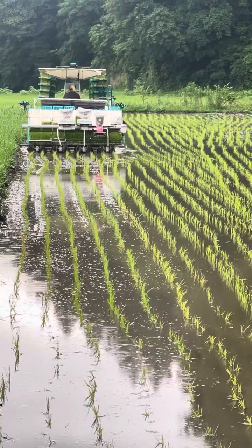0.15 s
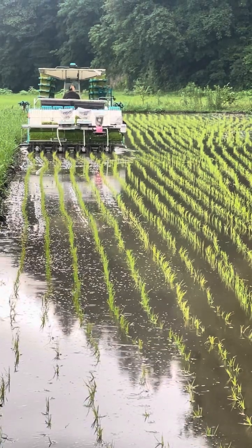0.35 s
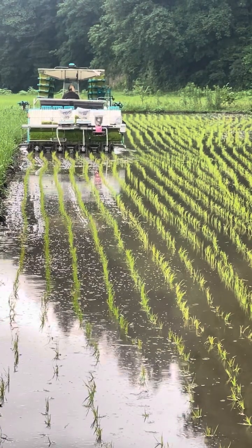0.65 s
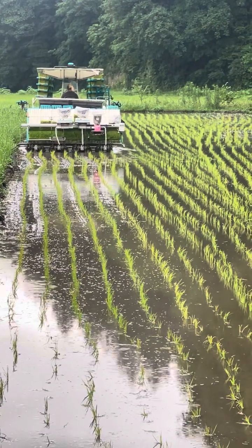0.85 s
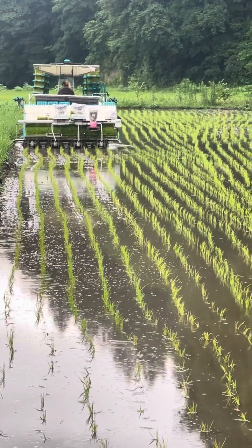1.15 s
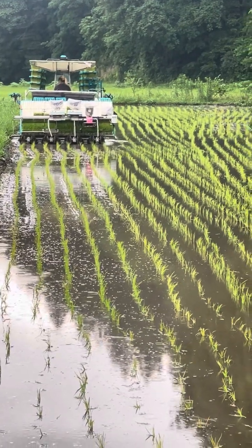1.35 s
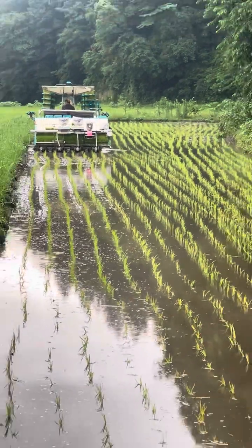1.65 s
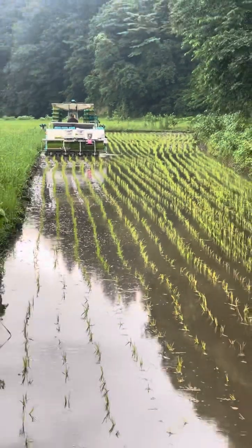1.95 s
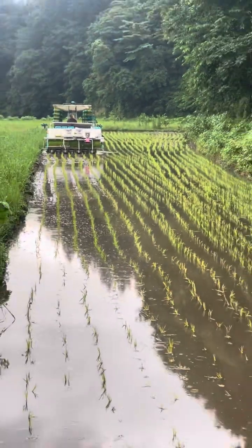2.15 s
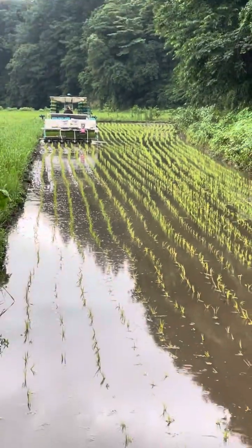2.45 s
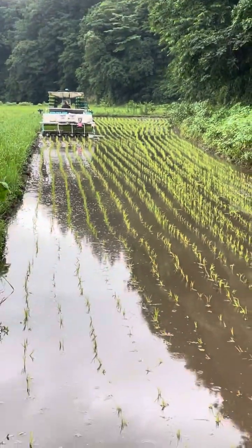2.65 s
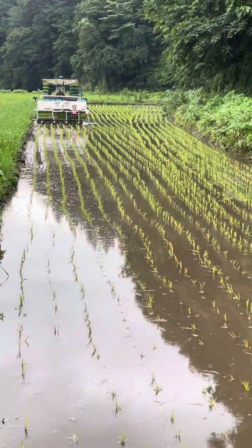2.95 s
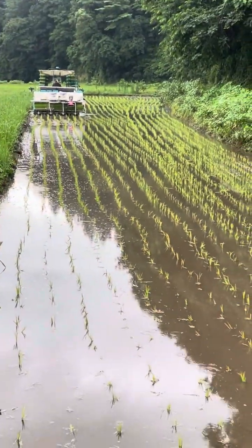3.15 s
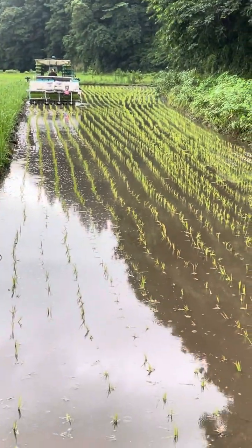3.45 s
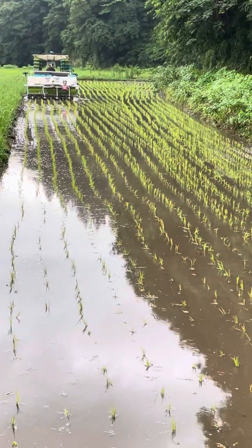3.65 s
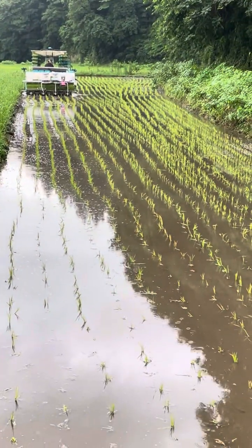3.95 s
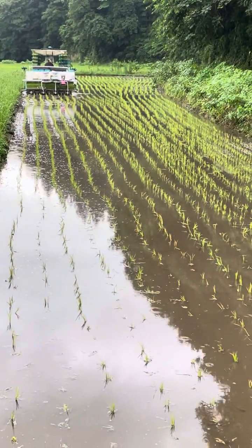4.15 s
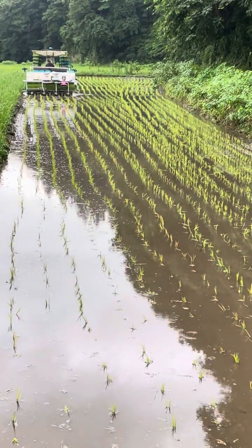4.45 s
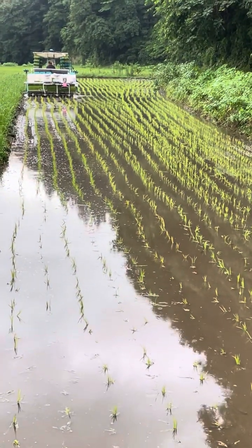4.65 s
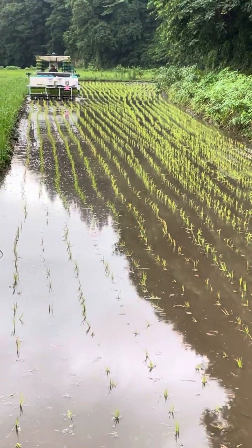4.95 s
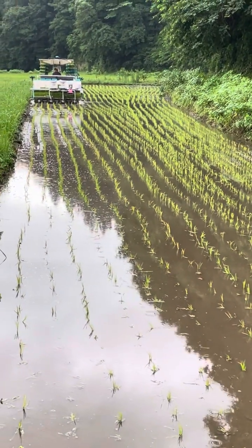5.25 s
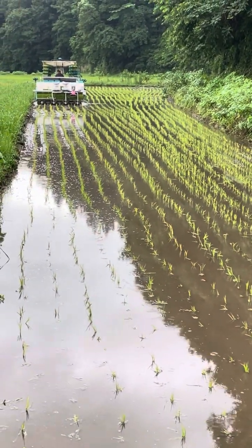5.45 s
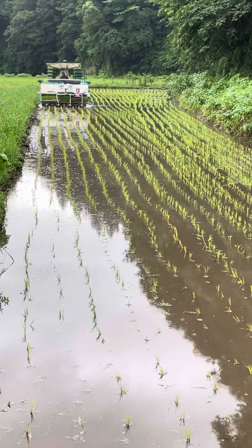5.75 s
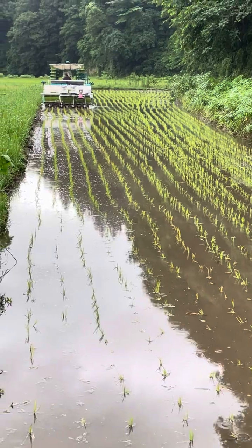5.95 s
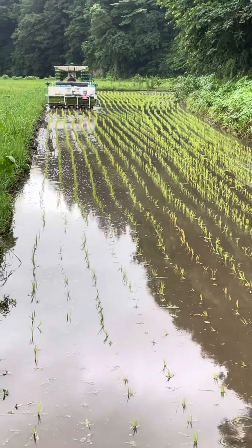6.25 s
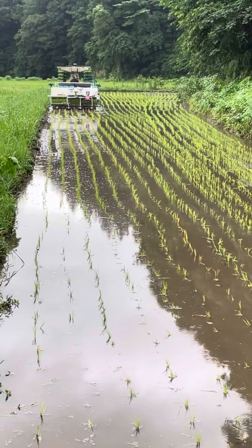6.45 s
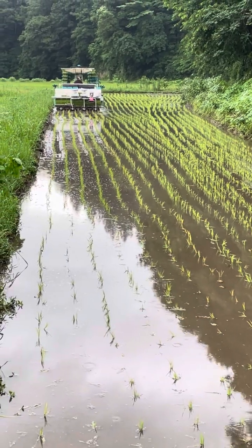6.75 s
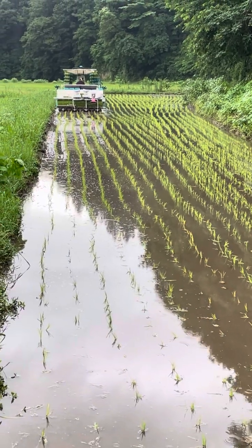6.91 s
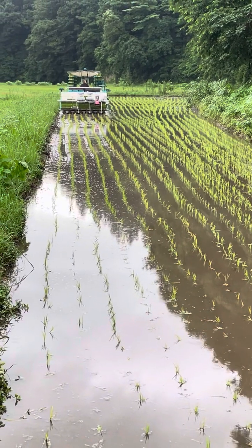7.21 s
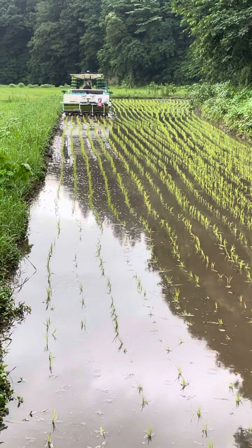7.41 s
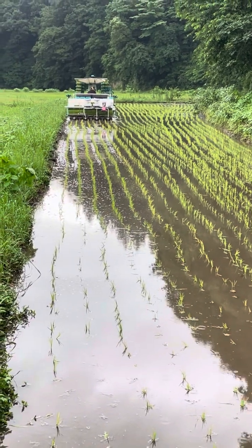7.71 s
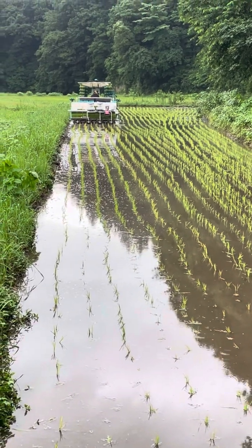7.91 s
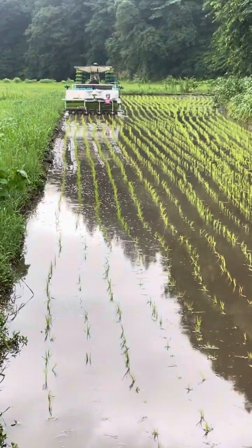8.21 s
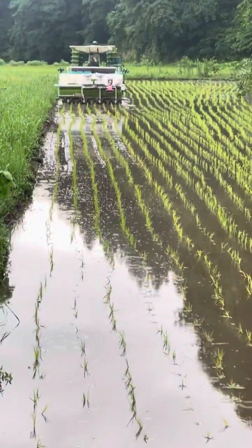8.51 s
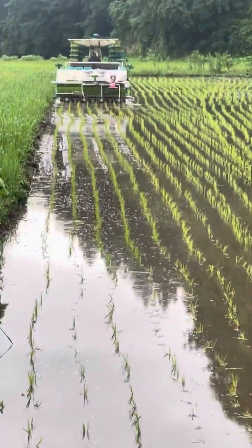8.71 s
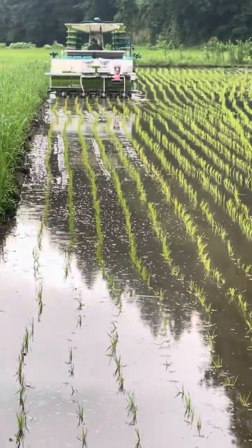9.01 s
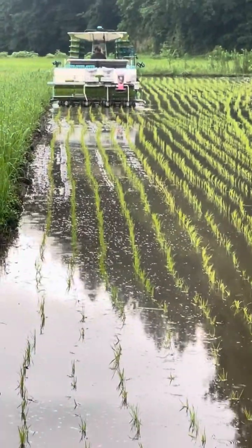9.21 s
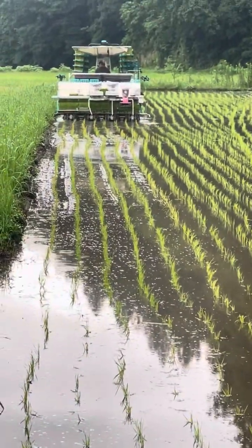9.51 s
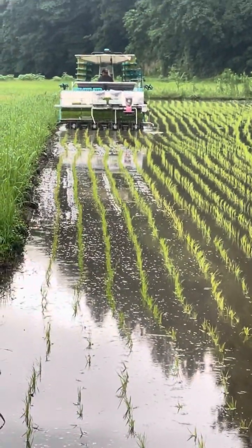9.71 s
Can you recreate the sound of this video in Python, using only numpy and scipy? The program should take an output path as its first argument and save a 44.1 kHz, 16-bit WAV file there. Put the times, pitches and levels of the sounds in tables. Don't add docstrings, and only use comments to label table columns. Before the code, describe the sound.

A planting machine's low two-cylinder engine drones across a flooded field, easing quieter then returning slightly, under steady hissing rain with clacks, drips and brief bird whistles.

```python
import sys
import numpy as np
from scipy import signal
from scipy.fft import rfft, irfft, next_fast_len
from scipy.io import wavfile
from scipy.ndimage import uniform_filter1d, map_coordinates

SR = 44100
rng = np.random.default_rng(int(sys.argv[2]) if len(sys.argv) > 2 else 0)


def log_audio(samples):
    frames = np.atleast_2d(samples).T
    limited = np.clip(frames, -1, 1)
    pcm = np.round(limited * 32767).astype(np.int16)
    wavfile.write(sys.argv[1], SR, pcm)


def to_linear_factor(level_db):
    exponent = np.asarray(level_db, float) / 20
    return 10 ** exponent


N = 435266

# (t/s, drone level/dB, exhaust level/dB, imbalance of the two cylinders/dB)
ENGINE_PATH = [(0, -34, -42.5, 1), (.5, -34, -46.5, -7), (.75, -33.5, -45, -2), (1.15, -36, -43.5, -4),
               (1.75, -35, -45, 0), (2.1, -39, -50, -1), (2.45, -42, -50.5, 2), (3.5, -39.5, -51, -5),
               (4.1, -42, -52.5, 0), (4.8, -41.5, -59.5, 2), (5.3, -40, -55.5, 0), (5.5, -41, -54.5, -2),
               (6.3, -39.5, -51.5, -3), (6.7, -41.5, -56, -5), (7.7, -46, -57.5, -3), (8.5, -47, -56, 0),
               (8.95, -45.5, -52.5, -7), (9.87, -41, -49, -5)]
# (t/s, f/Hz)
FIRING_SPEED = [(0, 60.9), (.93, 61.77), (2.1, 60.95), (2.4, 60.97), (3.76, 61.93), (5.15, 60.93),
                (5.58, 61.83), (6.14, 61.15), (6.95, 61.86), (8.9, 61.07), (9.27, 62)]
# (t/s, half length/s, level/dB)
LOAD_SURGES = [
    (0.103, 0.15, 7.5),
    (0.354, 0.044, 2.5),
    (0.926, .11, 7.5),
    (5.9, 0.065, 4),
    (6.067, 0.08, 4.5),
    (8.6, 0.089, 2.5),
]
# (t/s, level/dB)
LOW_SWELLS = [
    (1.67, 5),
    (4.63, 4),
    (6.5, 1),
    (7.39, 7),
    (7.83, 4),
    (8.25, 9),
    (8.49, 9),
    (8.64, 9),
    (9.29, 16),
]
# (multiple, level/dB)
UPPER_ORDERS = [(3, -1.5), (4, 0), (5, -16), (6, -6), (6.5, -11), (7, -4.5), (7.5, -14.5)]
# (f/Hz, level/dB per Hz)
EXHAUST_COLOUR = [(30, -17), (60, -2), (100, -0.5), (200, -5.5), (300, 0.5), (440, 0.5), (520, -12.5),
                  (800, -34), (1200, -60)]
# (f/Hz, width/Hz, level/dB, gear 0 low or 1 high)
GEAR_TONES = [
    (661, 10, -64, 0),
    (1322, 10, -63, 0),
    (1655, 22, -62.5, 1),
]
# (t/s, speed ratio, low gear level/dB, high gear level/dB)
WHEEL_DRIVE = [(0, 1, 1, 0), (.8, 1, 0, 1), (1, 1.017, 0, 3), (1.5, 1.021, 3, 4), (1.75, 1.016, -4, 3),
               (2, 1, -3, -4), (2.25, 1, 4, 0), (3.6, .999, 2, 1), (3.9, 1.02, -4, -2),
               (5.05, 1.021, -2, -3), (5.3, 1, 3, 0), (5.85, 1.02, -4, 0), (6.2, 1.001, 4, 1),
               (6.8, 1.008, -3, 2), (7.6, 1.018, -5, 0), (8.7, 1.017, -5, 3), (9.05, .999, -5, 3),
               (9.4, 1.015, 0, 2)]
# (t/s, level/dB)
RAIN_STRENGTH = [(0, -0.5), (.22, 1.5), (.5, -.5), (1.7, 1.1), (2.6, 0), (3.7, 1.5), (4.5, -.5), (5.4, -1),
                 (6.02, 1), (6.4, 0.5), (7.45, -1), (7.7, -4.5), (7.95, -2.5), (8.2, 1), (8.5, -0.8),
                 (8.75, 1), (9.3, -0.1), (9.87, -.3)]
# (t/s, level/dB)
WASH_SWAY = [(0, 3.5), (1.9, 3.5), (2.6, 1), (6.3, 1), (7.1, -2.5), (8.1, -4), (9.3, 0), (9.87, 1.5)]
# (f/Hz, level/dB per Hz)
WASH_COLOUR = [(200, -34), (450, -0.5), (620, -3.5), (800, 0.5), (1100, -1), (1450, -4.5), (2000, -13.5),
               (3000, -48)]
PATTER_COLOUR = [(800, -39), (1400, -12.5), (1800, 0), (2600, -1.5), (3400, -2.5), (4500, -7), (5500, -15),
                 (7000, -39)]
FIZZ_COLOUR = [(3000, -46), (4500, -8.5), (5500, -1.5), (7500, -1), (10000, 2), (12000, -5.5), (13800, -9),
               (16000, -15.5)]
# (t/s, peak level/dB, f/Hz)
SHARP_DROPS = [(0.0513, -40, 5260), (0.1531, -40, 5850), (0.2189, -38, 5430), (0.2448, -35, 6560),
               (0.5407, -38, 7460), (0.7327, -38, 4240), (0.829, -37, 4600), (1.2261, -39, 4200),
               (1.3264, -34, 5750), (1.4037, -39, 6000), (1.4361, -38, 5770), (1.5618, -40, 5810),
               (1.8662, -37, 4300), (1.934, -29, 5210), (2.2049, -37, 5260), (2.2443, -40, 4400),
               (2.2712, -33, 6310), (2.3067, -35, 4780), (2.369, -39, 6640), (2.579, -40, 6170),
               (2.6529, -39, 5630), (2.8095, -39, 4430), (3.0076, -35, 4290), (3.1752, -34, 4730),
               (3.3912, -37, 5426), (3.5843, -33, 5270), (3.677, -33, 6210), (3.7703, -39, 4220),
               (3.8247, -38, 5210), (3.9589, -34, 5905), (4.0472, -34, 6240), (4.125, -34, 5600),
               (4.1589, -28, 5560), (4.2842, -37, 5300), (4.5246, -37, 5470), (4.5875, -37, 4460),
               (4.9566, -32, 7460), (5.2734, -37, 4275), (5.5613, -40, 6980), (5.6531, -38, 5450),
               (6.3031, -35, 6920), (6.326, -35, 5820), (6.3884, -36, 5670), (6.5, -29, 7190),
               (6.7865, -41, 4220), (7.2664, -35, 5890), (7.4155, -33, 4490), (7.4719, -35, 4490),
               (7.5827, -36, 4490), (7.9463, -36, 4470), (8.0815, -36, 5295), (8.2492, -33, 4630),
               (8.5185, -35, 7400), (8.5724, -35, 4470), (8.6043, -37, 4470), (8.8443, -41, 6480),
               (9.0588, -37, 4230), (9.8051, -39, 4293)]
# (t/s, peak level/dB, f/Hz)
BUBBLE_DROPS = [(0.7355, -35, 2460), (0.829, -30, 3050), (1.0344, -35, 1700), (1.2275, -34, 1830),
                (1.3268, -38, 2050), (1.5183, -33, 1850), (2.2075, -31, 2120), (2.627, -33, 2590),
                (2.6832, -36, 2150), (2.9795, -39, 2127), (3.0753, -31, 2330), (3.6221, -38, 2270),
                (3.6739, -43, 1900), (4.1247, -39, 2010), (4.1921, -35, 2270), (4.3569, -33, 1970),
                (4.7475, -34, 2100), (5.6525, -30, 1890), (5.7946, -31, 2000), (6.075, -36, 1980),
                (6.1997, -36, 1950), (6.2974, -36, 1880), (6.3254, -34, 1890), (6.723, -34, 2370),
                (6.758, -34, 2080), (7.1888, -30, 3245), (7.2403, -37, 2740), (7.3207, -36, 2030),
                (7.5438, -31, 3610), (8.1513, -36, 1907), (8.9475, -32, 1930), (9.4383, -31, 2503)]
# (start t/s, length/s, from f/Hz, to f/Hz, level/dB)
BIRD_SONG = [
    (.01, .07, 2760, 3010, -4.5),
    (.055, .085, 3010, 2700, -5.5),
    (.185, .055, 2660, 2615, 1),
    (.237, .052, 2590, 2565, 2),
    (.28, .045, 2560, 2510, -8),
    (.32, .04, 2330, 2130, -2),
]
NOTE_FLUTTERS = [0.032, .034, .01, 0.014, .02, 0.036]
# (start t/s, level/dB, pitch ratio, length ratio, flutter ratio)
BIRD_PHRASES = [
    (-.315, -39.5, 1.08, 1, 1.3),
    (.04, -41.5, 1, 1, 1.15),
    (.432, -41.5, .995, 1.08, 1.15),
]
# (start t/s, length/s, from f/Hz, to f/Hz, level/dB)
FAR_PHRASE = [
    (7.03, .12, 3750, 3735, -56.5),
    (7.13, .08, 3735, 3720, -61),
    (7.2, .06, 2830, 2720, -52.5),
    (7.395, .03, 2790, 2850, -47.5),
    (7.413, .055, 3020, 3030, -46.5),
    (7.44, .07, 2850, 2800, -55),
    (7.576, .092, 2660, 2590, -45.5),
    (7.665, .055, 2610, 2570, -53),
    (7.73, .05, 2380, 2250, -50),
]
# (t/s, peak level/dB, f/Hz)
CLACKS = [(0.217, -28.5, 2650), (2.313, -32, 5000), (0.737, -33, 3890), (0.829, -36, 4000),
          (1.1123, -30, 2150), (1.2284, -35, 3520), (1.561, -37, 2690), (1.93, -29, 1900),
          (2.2457, -33, 3364), (2.3065, -28.5, 2920), (3.0076, -31.5, 2120), (3.0483, -38, 3270),
          (3.1745, -28, 3800), (3.367, -29, 2650), (3.3972, -31, 2910), (3.771, -31.5, 3960),
          (4.5237, -33, 2730), (5.2727, -30, 3540), (6.0292, -31.5, 3940), (6.4073, -36, 2670),
          (6.4974, -33, 3330), (6.657, -35.5, 3240), (6.787, -32, 2700), (6.96, -32, 2430),
          (7.3925, -31.5, 3200), (8.049, -35, 3210), (8.1271, -36, 3700), (8.604, -37, 2770),
          (8.905, -32, 3100), (9.0588, -35.5, 4205)]
# (t/s, peak level/dB, share unlike at the two ports)
CLOSE_DROPS = [(0.2453, -37, 1), (0.3511, -46, .2), (0.5427, -44.5, .2), (0.7332, -42, .2),
               (1.1134, -37, .2), (1.405, -43, .7), (2.0058, -35, .5), (2.2049, -35, 0.61),
               (2.6274, -41, .2), (3.3912, -34, 0.64), (4.1505, -37, .2), (5.0898, -34, .2),
               (5.5618, -45, .2), (5.654, -36, .2), (5.902, -40, .2), (6.4093, -36, 0.93),
               (6.7246, -46, .2), (7.43, -43, 0.93), (7.6176, -36, .4), (8.527, -40, 0.84),
               (9.2289, -47, .2)]
# (f/Hz, level/dB per Hz)
CLOSE_DROP_COLOUR = [(4000, -25), (7500, -2), (10500, -0.5), (13000, -1), (15500, -7)]
# (t/s, peak level/dB, f/Hz, rise/s)
FINGER_KNOCKS = [(4.2266, -33.5, 490, 0.0024), (4.2303, -25, 280, 0.0024), (4.5355, -13.5, 268, 0.0063),
                 (4.5285, -33, 450, .002), (4.746, -32, 520, .002), (4.7536, -12, 290, 0.00535),
                 (6.4778, -19.5, 180, 0.0037), (6.4755, -25, 420, 0.0015), (6.484, -25, 299.4, 0.004),
                 (6.4935, -28.5, 110, 0.0036), (9.670, -30, 1230, 0.0016), (9.669, -35, 1700, 0.0014),
                 (.83, -34.5, 4000, 0.0018), (4.3, -39, 310, 0.026)]
# (pitch ratio, level/dB)
CASE_OVERTONE = (1.96, -19)
# (f/Hz, phase/radians)
PORT_LEAD = [(0, 0), (330, 0), (600, -.3), (900, .2), (1400, 0), (4000, .15), (4900, 1.8), (5060, 0),
             (5500, 0), (9900, 3.14), (11500, 4.25), (13300, 5.1), (14650, 6.28), (22050, 6.28)]
# (f/Hz, level/dB)
PORTS_APART = [(60, -49), (200, -38), (400, -19), (650, -9), (900, -11), (1150, -9), (1700, -16),
               (2400, -13.5), (4000, -15), (4950, -4), (5400, -24), (6500, -11), (9800, -18), (13300, -7),
               (14500, -20)]
# (f/Hz, level/dB)
WEAKER_LIMIT = [(100, -55), (1300, -30), (1700, -14), (6000, -11), (9000, -8.5), (11000, -6), (13000, -8),
                (15000, -6)]
# (t/s, share missing)
TREBLE_GAPS = [(0, .2), (.55, .15), (.7, .01), (8.6, .01), (8.75, .3), (9.87, .3)]

FIRST_DB, FIRST_FOLLOWS, FIRST_WAVERS_DB = -50.5, 0.63, 2
UPPER_DB, UPPER_FOLLOWS, UPPER_LEANS = -54, 0.73, 0.52
SETTLE_S, BEAT_SWELL_S = 0.13, 0.03
WASH_DB, PATTER_DB, FIZZ_DB = -51.5, -48.5, -48.5
PING_DB, PING_CYCLES, PLOP_DB, PLOP_CYCLES = -2, 7.6, -4, 7
BUBBLE_DB, BUBBLE_HZ, BUBBLE_SPREAD, BUBBLE_CYCLES = -57, 2802, .5, 9
CLACK_T60_S, SPATTER_S, SPATTER_DB = 0.032, .022, -8


def unit(x):
    return x / np.sqrt(np.mean(x ** 2) + 1e-20)


def along(points, hz):
    f, v = np.transpose(points)
    return np.interp(np.log(hz + 1), np.log(f + 1), v)


def curves(rows):
    s, *cols = np.transpose(rows)
    return [np.interp(np.arange(N) / SR, s, c) for c in cols]


def wobble(rate):
    points = rng.standard_normal(int(N * rate / SR) + 4)
    return map_coordinates(points, [np.arange(N) * rate / SR])


def filtered(x, response):
    m = next_fast_len(N + SR // 2)
    return irfft(rfft(x, m) * response(np.fft.rfftfreq(m, 1 / SR)), m)[..., :N]


def coloured(x, spectrum):
    return unit(filtered(x, lambda hz: to_linear_factor(along(spectrum, hz))))


def hiss(patchy_db):
    z = signal.stft(rng.standard_normal(N), nperseg=512)[2]
    field = uniform_filter1d(rng.standard_normal(z.shape), size=8, axis=0)
    field = uniform_filter1d(field, size=6, axis=1)
    return signal.istft(z * to_linear_factor(patchy_db * unit(field)), nperseg=512)[1][:N]


def swells(rows):
    t = np.arange(N) / SR
    return sum(db * np.exp(-((t - s) / half) ** 2) for s, half, db in rows)


def drone(turn):
    second_db, exhaust_db, uneven_db = curves(ENGINE_PATH)
    upper_db = UPPER_DB + UPPER_FOLLOWS * (exhaust_db + 51) + UPPER_LEANS * (second_db + 41)
    second_db = second_db + swells(LOAD_SURGES)
    first_db = FIRST_DB + FIRST_FOLLOWS * (second_db + 41) + uneven_db + FIRST_WAVERS_DB * wobble(14)
    first_db += swells([(s, BEAT_SWELL_S, db) for s, db in LOW_SWELLS])
    out = to_linear_factor(first_db) * np.cos(turn)
    out += to_linear_factor(second_db + 0.52 * wobble(10)) * np.cos(2 * turn)
    for order, db in UPPER_ORDERS:
        level = to_linear_factor(upper_db + db + .24 * order * wobble(14))
        out += level * np.cos(order * turn + .008 * order ** 2 * wobble(12))
    return np.sqrt(2) * out


def exhaust(turn):
    level_db = curves(ENGINE_PATH)[1]
    puffs = (1 + 0.45 * np.cos(turn)) * to_linear_factor(1.2 * wobble(18) + 1.2 * wobble(55)) * hiss(patchy_db=1.2)
    return to_linear_factor(level_db + 1.85) * coloured(puffs, EXHAUST_COLOUR)


def gear_whine():
    ratio, *gear_db = curves(WHEEL_DRIVE)
    speed = 2 * np.pi * np.cumsum(ratio) / SR
    whine = np.zeros(N)
    for hz, width, db, gear in GEAR_TONES:
        whine += to_linear_factor(db + gear_db[gear] + 2 * wobble(7)) * np.sin(hz * speed + .6 * wobble(width))
    return to_linear_factor(0.47 * (curves(ENGINE_PATH)[1] + 53)) * whine


def engine():
    when, speeds = np.transpose(FIRING_SPEED)
    latest = np.clip(np.searchsorted(when, np.arange(N) / SR) - 1, 0, None)
    firing_hz = uniform_filter1d(speeds[latest], size=round(SETTLE_S * SR)) + 0.1497 * wobble(7)
    turn = 2 * np.pi * np.cumsum(firing_hz) / SR
    return drone(turn) + exhaust(turn) + gear_whine()


def drops(count, life):
    when, size = rng.random((count, 2)).T
    hits = np.bincount((when * N).astype(int), to_linear_factor(-4.5 * np.log(size + .02)), N)
    fading = signal.lfilter([1], [1, -np.exp(-1 / (life * SR))], hits)
    return unit(fading * rng.standard_normal(N))


def rain():
    (strength_db,), (sway_db,) = curves(RAIN_STRENGTH), curves(WASH_SWAY)
    gust = to_linear_factor(0.31 * wobble(7.1) + 0.91 * wobble(25))
    splash = drops(count=3000, life=0.0026)
    wash = hiss(patchy_db=1.5) + 0.25 * splash
    patter = gust * hiss(patchy_db=1) + .2 * splash + .3 * drops(count=5000, life=.003)
    fizz = gust * hiss(patchy_db=2.0) + 0.52 * splash + 0.44 * drops(count=6000, life=0.0021)
    out = to_linear_factor(WASH_DB + sway_db + 0.47 * strength_db) * coloured(wash, WASH_COLOUR)
    out += to_linear_factor(PATTER_DB + strength_db) * coloured(patter, PATTER_COLOUR)
    return out + to_linear_factor(FIZZ_DB + 0.66 * strength_db) * coloured(fizz, FIZZ_COLOUR)


def blips(when, gain, hz, cycles):
    t = np.arange(SR // 50) / SR
    life = t * hz[:, None] / np.clip(cycles, 2, 14)
    shape = np.exp(-life) * (1 - np.exp(-5 * life))
    wave = gain[:, None] * shape * np.sin(2 * np.pi * hz[:, None] * t * (1 + .03 * life))
    at = (when * SR).astype(int)[:, None] + np.arange(len(t))
    return np.bincount(at.ravel(), wave.ravel(), N + SR)[:N]


def bubbles(count=3000):
    s, db, hz = np.transpose(SHARP_DROPS)
    pings = blips(s, to_linear_factor(db + PING_DB), hz, PING_CYCLES)
    s, db, hz = np.transpose(BUBBLE_DROPS)
    plops = blips(s, to_linear_factor(db + PLOP_DB), hz, PLOP_CYCLES)
    hz = np.clip(BUBBLE_HZ * np.exp(BUBBLE_SPREAD * rng.standard_normal(count)), 1500, 8500)
    gain = to_linear_factor(np.minimum(3 * rng.exponential(size=count), 9)) * np.sqrt(BUBBLE_HZ / hz)
    scatter = blips(rng.random(count) * N / SR, gain, hz, BUBBLE_CYCLES)
    return pings + plops + to_linear_factor(BUBBLE_DB + curves(RAIN_STRENGTH)[0]) * unit(scatter)


def bird():
    notes = [(*note, .006) for note in FAR_PHRASE]
    for at, level, ratio, pace, rough in BIRD_PHRASES:
        for (s, length, from_hz, to_hz, db), share in zip(BIRD_SONG, NOTE_FLUTTERS):
            if at + s >= 0:
                notes.append((at + pace * s, pace * length, ratio * from_hz, ratio * to_hz,
                              level + db, rough * share))
    out, flutter = np.zeros(N), wobble(220)
    for start, length, from_hz, to_hz, db, share in notes:
        a, n = round(start * SR), round(length * SR)
        u = np.linspace(0, 1, n)
        shape = abs(np.sin(np.pi * u ** 0.62)) ** 0.72
        hz = (from_hz + (to_hz - from_hz) * u) * (1 + share * flutter[a:a + n])
        out[a:a + n] += to_linear_factor(db) * shape * np.sin(2 * np.pi * np.cumsum(hz) / SR)
    t = np.arange(SR // 3) / SR
    trees = rng.standard_normal(len(t)) * to_linear_factor(-60 * t / .2)
    echo = signal.fftconvolve(out, trees / np.linalg.norm(trees))[:N]
    return out * to_linear_factor(1.5 * wobble(70)) + .4 * echo


def clacks():
    out, t = np.zeros(N + SR), np.arange(SR // 10) / SR
    for s, db, hz in CLACKS:
        crack = rng.standard_normal(len(t))
        ring = unit(signal.lfilter(*signal.iirpeak(hz, 1.8, SR), crack))
        delays = np.r_[0, SPATTER_S * rng.random(3)]
        late = np.clip(t - delays[:, None], 0, None)
        fall = to_linear_factor(db - 8.5 - 60 * late / CLACK_T60_S) * (1 - np.exp(-late / 0.002))
        shape = fall[0] + to_linear_factor(SPATTER_DB) * fall[1:].sum(0)
        out[round(s * SR):][:len(t)] += shape * (ring + 0.25 * crack)
    return out[:N]


def spits():
    out, t = np.zeros((2, N + SR)), np.arange(SR // 50) / SR
    for s, db, unlike in CLOSE_DROPS:
        a, b = rng.standard_normal((2, len(t)))
        fall = to_linear_factor(db + 3.5 - 60 * t / 0.012)
        out[:, round(s * SR):][:, :len(t)] += fall * np.array([a + unlike * b, a - unlike * b])
    return filtered(out[:, :N], lambda hz: to_linear_factor(along(CLOSE_DROP_COLOUR, hz)))


def bumps():
    out, t = np.zeros(N), np.arange(-SR // 20, SR // 20) / SR
    ratio, over_db = CASE_OVERTONE
    for s, db, hz, rise in FINGER_KNOCKS:
        sag = 0.099 * rise * np.expm1(np.clip(-1.3 * t / rise, -9, 3)) + 0.16 * t
        shape = np.exp(-(t / np.where(t < 0, rise, 0.57 * rise)) ** 2)
        knock = np.cos(2 * np.pi * hz * (t - sag) - .8)
        knock += to_linear_factor(over_db) * np.cos(2 * np.pi * ratio * hz * t)
        out[round(s * SR) - SR // 20:][:len(t)] += to_linear_factor(db) * shape * knock
    return out


def scene():
    field = engine() + rain() + bubbles() + bird() + clacks() + bumps()
    z = signal.stft(field, nperseg=512)[2]
    scattered = signal.istft(z * np.exp(2j * np.pi * rng.random(z.shape)), nperseg=512)[1][:N]
    scattered = filtered(scattered, lambda hz: to_linear_factor(along(PORTS_APART, hz) + 3))

    def slip(hz):
        return np.exp(.5j * np.interp(hz, *np.transpose(PORT_LEAD)) * [[1], [-1]])

    return filtered(np.array([field + scattered, field - scattered]) + spits(), slip)


def thin_stereo(x):
    hz, s, z = signal.stft(np.array([x[0] + x[1], x[0] - x[1]]) / 2, SR, nperseg=2048)
    edges = np.r_[0:320:16, 320:len(hz):32]
    band = np.searchsorted(edges, np.arange(len(hz)), "right") - 1
    size = np.sqrt(np.add.reduceat(abs(z) ** 2, edges, axis=1))
    missing = np.interp(s, *np.transpose(TREBLE_GAPS))
    margin_db = along(WEAKER_LIMIT, hz[edges])[:, None] + 1.3 * rng.standard_normal(size.shape[1:])
    margin_db = margin_db + 12 * (hz[edges] > 9000)[:, None] * missing
    kept = (size > size[::-1] * to_linear_factor(margin_db))[:, band] & (hz < 15800)[:, None]
    holes = rng.random(z.shape[1:])[np.arange(len(hz)) // 12 * 12] < missing
    mid, side = z * kept
    mid = mid * ~(holes & (hz > 11000)[:, None])
    mid, side = signal.istft(np.array([mid, side]), SR, nperseg=2048)[1][:, :N]
    return np.array([mid + side, mid - side])


def band_limit(x):
    return signal.sosfilt(signal.butter(12, 16010, fs=SR, output="sos"), x)


def record(dry):
    mix = thin_stereo(dry)
    return band_limit(mix)


dry = scene()
out = record(dry)
log_audio(out)
```